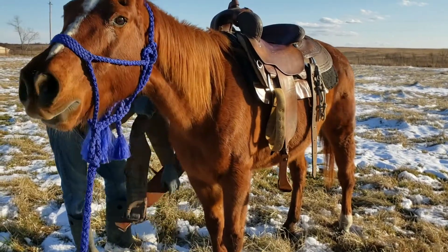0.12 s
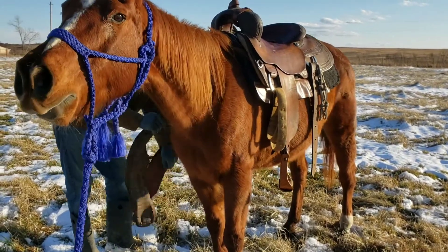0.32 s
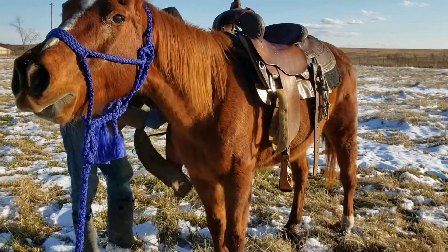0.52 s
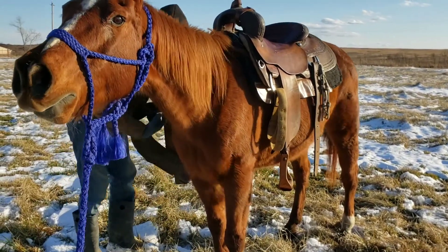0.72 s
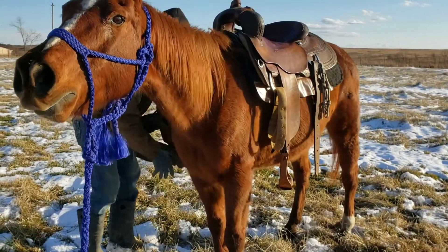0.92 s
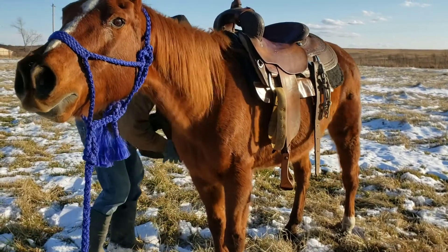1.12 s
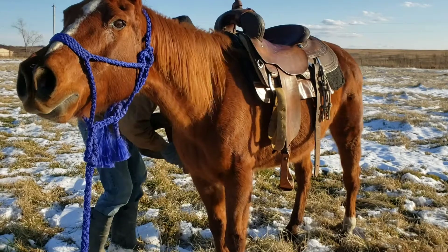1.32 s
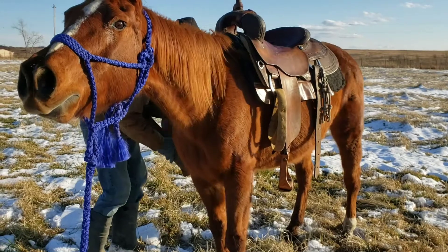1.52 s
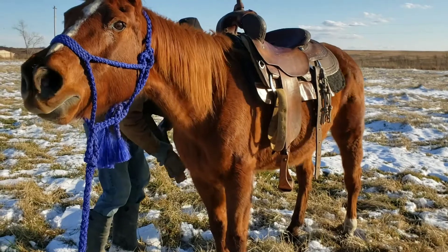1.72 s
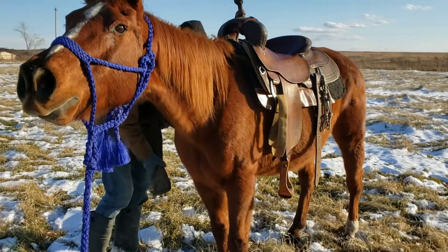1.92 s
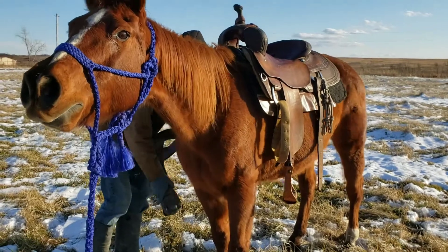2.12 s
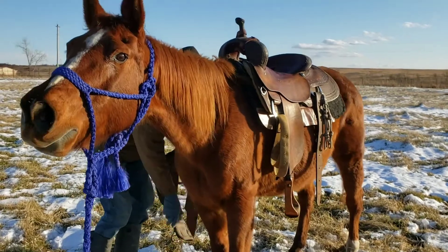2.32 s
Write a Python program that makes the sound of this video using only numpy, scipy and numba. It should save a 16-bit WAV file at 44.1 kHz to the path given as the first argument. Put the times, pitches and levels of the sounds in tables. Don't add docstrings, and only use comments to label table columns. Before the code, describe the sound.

Close horse nicker: quick fluttering nose puffs deepening into a throbbing low throat rumble outdoors

```python
import sys
import numpy as np
from scipy import signal
from scipy.fft import rfft, irfft, next_fast_len
from scipy.io import wavfile
from scipy.ndimage import uniform_filter1d, map_coordinates
from numba import njit

SR = 44100
rng = np.random.default_rng(int(sys.argv[2]) if len(sys.argv) > 2 else 0)


def master(y):
    cut = np.clip(np.atleast_2d(y).T, -1, 1)
    pcm = np.round(cut * 32767)
    wavfile.write(sys.argv[1], SR, pcm.astype(np.int16))


def attenuation_scalar(level_db):
    decades = np.asarray(level_db, float) / 20
    return 10 ** decades


N = 108045
T = np.arange(N) / SR

# f/Hz, density/dB
WIND_SPECTRUM = [(20, -34.5), (50, -5.5), (90, -5.5), (250, -18.5), (1500, -29.5), (9000, -29),
                 (15500, -58)]
# t/s, level/dB
GUSTS = [
    (0, -57),
    (.3, -67),
    (.39, -38),
    (.55, -63),
    (.9, -66),
    (1.8, -55),
    (2.2, -63),
    (2.45, -48),
]
# start t/s, end t/s, from f/Hz, to f/Hz, level/dB
SNIFFS = [
    (0.0, 0.071, 1700, 1430, -38.5),
    (0.1, 0.187, 1284, 1000, -35.5),
]
# start t/s, peak t/s, end t/s, level/dB
IN_BREATHS = [
    (-0.1, 0.0, 0.06, -45.5),
    (0.033, 0.135, 0.22, -38),
    (0.263, 0.329, 0.35, -45.5),
    (1.715, 1.834, 1.9, -44.5),
    (2.231, 2.354, 2.43, -50),
]
# start t/s, peak t/s, end t/s, level/dB, lowest throat f/Hz
PUFFS = [(0.17, 0.26, 0.31, -21.5, 480), (0.32, 0.40, 0.465, -20, 301.8), (0.485, 0.565, 0.635, -21, 270),
         (0.65, 0.73, 0.80, -21.5, 220), (0.82, 0.895, 0.96, -21, 184.5), (0.995, 1.062, 1.12, -20, 165),
         (1.185, 1.24, 1.30, -18.5, 165), (1.365, 1.42, 1.47, -19, 160.2), (1.555, 1.60, 1.65, -20, 164.2),
         (1.915, 1.94, 2.12, -31.5, 155), (2.065, 2.118, 2.17, -18.5, 169.9)]
# t/s, peak level/dB, length/s
SPITS = [(0.805, -19.5, 0.0048), (1.317, -28.5, 0.0081), (1.484, -20, .006), (1.503, -35, 0.014),
         (1.66, -21, 0.0052), (1.864, -20, .008), (1.936, -23.5, 0.0062), (1.995, -12, 0.0047),
         (2.014, -12, .005), (2.03, -17.5, 0.0081), (2.39, -27.5, 0.017)]
# t/s, scale of passage pitches, whistle level/dB, throat breath level/dB,
# passage ring level/dB
EFFORT = [
    (0, 0.96, -4, -25, -4),
    (0.4, 1.015, -4, -12.5, -0.5),
    (1.06, 1.003, -3, -7.5, 0.5),
    (1.24, 0.96, -10, -6.5, -4),
    (1.6, .97, -6, -7, -7),
    (2.45, 1.06, -16, -9, -11.5),
]
# f/Hz, width/Hz, level/dB, arch share while blowing, sag share over a puff
PASSAGES = [(647, 123, -11, 0.012, 0.14), (1130, 180, -3, 0.074, 0.055), (2139, 95, -3.5, 0.0095, 0.035),
            (2329, 87, -4.5, 0.022, 0.071), (2500, 90, -12.5, 0.0093, 0.039),
            (2955, 120, -28, 0.011, 0.011), (3386, 59, -17.5, 0.017, .01), (3611, 73, -11, 0.011, 0.024),
            (3924, 84, -17, .01, 0.013), (4767, 157, -16.5, 0.0064, 0.0106), (5530, 140, -26, .01, 0.016),
            (7080, 400, -16.5, 0.0033, 0.011)]
# f/Hz, density/dB
BROAD_SPECTRUM = [(150, -17.5), (500, -10.5), (1100, 1.5), (1500, 2.5), (2300, -2.5), (2600, -13.5),
                  (2800, -25.5), (5000, -19.5)]
# f/Hz, density/dB
HISS_SPECTRUM = [(300, -56.5), (1500, -3.5), (5000, -9), (8500, -13.5), (10000, -18), (12800, -10),
                 (15500, -5)]
# multiple of its pitch, level/dB
UPPER_MODES = [(1.95, -6.5), (3.1, -7)]
# t/s, peak level/dB
FLAPS = [(0.422, -24), (0.593, -17), (0.763, -14), (0.923, -33), (0.939, -13), (0.961, -28), (1.084, -42),
         (1.101, -12), (1.115, -16), (1.141, -13.5), (1.265, -11.5), (1.281, -13.5), (1.312, -15.5),
         (1.334, -17.5), (1.441, -12), (1.46, -31), (1.483, -13.5), (1.502, -16.5), (1.526, -21),
         (1.62, -11), (1.64, -36), (1.663, -25), (1.859, -26.5), (1.946, -18.5), (1.952, -19),
         (1.989, -22.5), (2.012, -16), (2.025, -11), (2.131, -13.5), (2.152, -13)]
# t/s, peak level/dB
LAST_FLAP = (2.388, -27)
# f/Hz, level/dB
PORT_TILT = [(100, -0.3), (700, 2.8), (2200, -1.5), (4000, -1), (12000, 3)]
# f/Hz, level/dB
SCATTER = [(200, -12), (1500, -15.5), (5000, 0.5), (12000, -0.5)]
# f/Hz, width/Hz, depth share
CASING_DIPS = [(2687, 134, 0.65), (4050, 116, 0.43), (8450, 900, 0.98), (11170, 800, 0.65)]


def unit(x):
    return x / np.sqrt(np.mean(x ** 2) + 1e-20)


def along(points, hz):
    f, value = np.transpose(points)
    return np.interp(np.log(hz + 1), np.log(f + 1), value)


def wobble(rate):
    return map_coordinates(rng.standard_normal(int(N * rate / SR) + 4), [T * rate])


def filtered(x, response):
    m = next_fast_len(N + SR // 4)
    return irfft(rfft(x, m) * response(np.fft.rfftfreq(m, 1 / SR)), m)[..., :N]


def shaped(noise, spectrum):
    return unit(filtered(noise, lambda hz: attenuation_scalar(along(spectrum, hz))))


@njit
def resonate(x, turn, keep):
    y = np.zeros(len(x))
    for i in range(2, len(x)):
        y[i] = x[i] - x[i - 2] + 2 * keep * turn[i] * y[i - 1] - keep * keep * y[i - 2]
    return y


def band(hz, width_hz):
    turn = np.cos(2 * np.pi * hz / SR)
    keep = np.exp(-np.pi * 1.5 * width_hz / SR)
    once = resonate(rng.standard_normal(N), turn, keep)
    return unit(resonate(once, turn, keep))


def swell(start, peak, end, db):
    rising = T < peak
    distance = np.where(rising, (peak - T) / (peak - start), (T - peak) / (end - peak))
    depth_db = np.where(rising, 26.5, 25)
    return attenuation_scalar(db - depth_db * np.minimum(distance, 3) ** 1.768)


def burst(s, db, rise_s, t60_s):
    gain, first = np.zeros(N), round(s * SR)
    t = T[:min(N - first, SR // 5)]
    gain[first:first + len(t)] = attenuation_scalar(db - 60 * t / t60_s) * (1 - np.exp(-t / rise_s))
    return gain


def effort_curve(column):
    table = np.transpose(EFFORT)
    return np.interp(T, table[0], table[column])


def wind(flapping):
    noise = rng.standard_normal((3, N))
    ports = noise[0] + 0.5 * noise[1:]
    hush = shaped(ports, WIND_SPECTRUM)
    thump = unit(filtered(ports, lambda hz: attenuation_scalar(along(WIND_SPECTRUM, hz)) / (1 + (hz / 110) ** 6)))
    blown = attenuation_scalar(-45) * uniform_filter1d(flapping, SR // 30) * 10
    gusts = attenuation_scalar(np.interp(T, *np.transpose(GUSTS)))
    return hush * attenuation_scalar(-59 + 4.5 * wobble(3.2)) + thump * (blown + gusts)


def sniffs():
    total = np.zeros(N)
    for start, end, from_hz, to_hz, db in SNIFFS:
        hz = np.interp(T, [start, end], [from_hz, to_hz])
        total += swell(start - 0.03, (start + end) / 2, end + 0.063, db) * band(hz, 60)
    return total


def gaps():
    return sum(np.exp(-((T - row[0] + 0.0027) / 0.032) ** 2) for row in PUFFS + IN_BREATHS[3:])


def whistle(size, blowing):
    hz = 1550 * size * (1 + 0.1665 * blowing ** 2)
    return attenuation_scalar(effort_curve(2)) * band(hz, 25)


def nose_passages(size, blowing, place):
    ring = np.zeros(N)
    for f, width_hz, db, arch, sag in PASSAGES:
        gain = attenuation_scalar(db + 3.2 * wobble(35.01))
        hz = f * size * (1 + arch * blowing - sag * place + 0.015 * wobble(25.13))
        ring += gain * band(hz, width_hz)
    return unit(ring) * attenuation_scalar(effort_curve(4))


def airflow():
    puffs = sum(swell(*row[:4]) for row in PUFFS)
    spits = sum(burst(s, db, 0.0005, 4 * length) for s, db, length in SPITS)
    draws = sum(swell(*row) for row in IN_BREATHS)
    blowing, place = np.zeros(N), np.zeros(N)
    for start, _, end, _, _ in PUFFS:
        across = (T - (start + end) / 2) / ((end - start) / 2)
        blowing += np.clip(1 - across ** 2, 0, 1)
        place += across * ((T >= start) & (T < end))
    size = effort_curve(1)
    whistling = whistle(size, blowing) * puffs * blowing
    nose = nose_passages(size, blowing, place)
    broad = attenuation_scalar(-5.5 + 3.3 * wobble(44.84)) * shaped(rng.standard_normal(N), BROAD_SPECTRUM)
    step = 1 / (0.12 * SR)
    trail = signal.lfilter([step], [1, step - 1], puffs) * np.clip(1.2 - 1.13 * gaps(), 0.05, 1)
    hiss = shaped(rng.standard_normal((3, N)), HISS_SPECTRUM) * attenuation_scalar(2.3 * wobble(60))
    hiss = hiss * (attenuation_scalar(-19) * (puffs + 0.94 * trail) + 0.22 * spits + 0.85 * draws)
    nose = nose * (puffs + 0.051 * trail + 0.7 * spits + 0.61 * draws)
    broad = broad * (puffs + 0.37 * trail + 0.9 * spits + 1.38 * draws)
    return whistling + nose + broad + hiss[0], hiss[1:]


def throat_pitch():
    top_hz, open_at = 1000, 0.88
    hz = np.full(N, PUFFS[-1][4] * 1.0)
    for start, _, end, _, low_hz in PUFFS[:9] + PUFFS[10:]:
        shut = np.clip(1 - (T - start) / (open_at * (end - start)), 0, 1) ** 0.96
        hz = np.where(T >= start, low_hz * (top_hz / low_hz) ** shut, hz)
    hz = np.where((T > PUFFS[8][2]) & (T < PUFFS[10][0]), PUFFS[9][4], hz)
    return hz * (1 + 0.04 * wobble(40))


def throat():
    hz, width_hz = throat_pitch(), 43.2
    late = sum(swell(s, p + 0.93 * (e - p), e + 0.01, db) for s, p, e, db, _ in PUFFS)
    modes = band(hz, width_hz) + sum(attenuation_scalar(db) * band(k * hz, k * width_hz) for k, db in UPPER_MODES)
    breathy = attenuation_scalar(effort_curve(3)) * late * modes
    drawn = attenuation_scalar(-5.5) * sum(swell(*row) for row in IN_BREATHS[2:]) * band(np.full(N, 200.5), 116)
    flaps = list(FLAPS) + [LAST_FLAP]
    flapping = sum(burst(s - 0.003, db + 3.5, 0.0079, 0.077) for s, db in flaps)
    phase = 2 * np.pi * np.cumsum(hz) / SR
    ring = np.cos(phase)
    ring += attenuation_scalar(-17 + 4.1 * wobble(50)) * np.cos(2 * phase)
    ring += attenuation_scalar(-26.5 + 1.8 * wobble(49.5)) * np.cos(3 * phase)
    rough_ring = ring * attenuation_scalar(1.495 * wobble(70)) + 0.35 * band(hz, 100)
    return breathy + drawn + flapping * rough_ring, flapping


def scene():
    low, flapping = throat()
    air, port_hiss = airflow()
    horse = air + low + sniffs()
    side, lag_s = np.array([[1], [-1]]), 16 / 44100

    def path(hz):
        return attenuation_scalar(side * along(PORT_TILT, hz) / 2) * np.exp(1j * np.pi * side * hz * lag_s)

    direct = filtered(horse + port_hiss, path)
    echo = rng.standard_normal((2, SR // 20)) * attenuation_scalar(-60 * T[:SR // 20] / 0.033)
    wet = signal.fftconvolve(horse[None], echo / np.linalg.norm(echo[0]), axes=1)[:, :N]
    scattered = filtered(wet, lambda hz: attenuation_scalar(along(SCATTER, hz)))
    return direct + scattered + wind(flapping)


def roll_off(x):
    return signal.sosfilt(signal.butter(12, 16780, fs=SR, output="sos"), x)


def record(dry):
    def casing(hz):
        dips = [1 - np.clip(depth, 0, 1) * np.exp(-((hz - f) / width) ** 2)
                for f, width, depth in CASING_DIPS]
        return (hz < 15800) * np.prod(dips, axis=0)

    return roll_off(filtered(dry, casing))


dry = scene()
out = record(dry)
master(out)
```